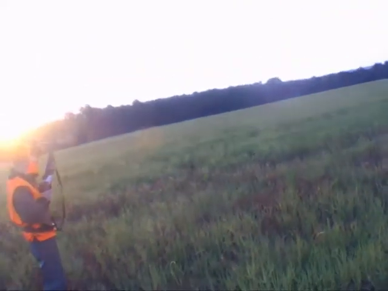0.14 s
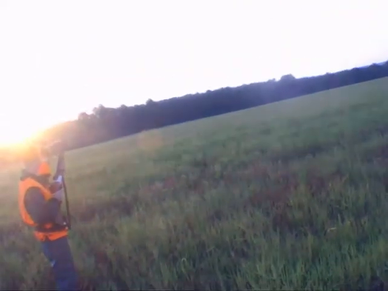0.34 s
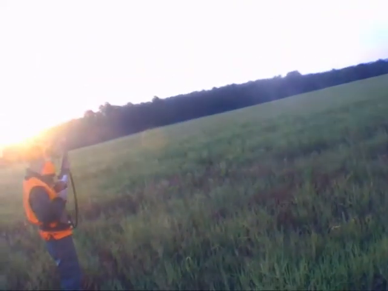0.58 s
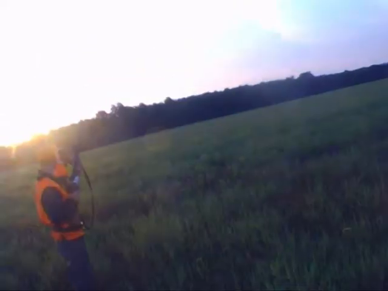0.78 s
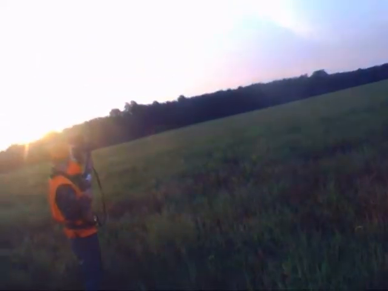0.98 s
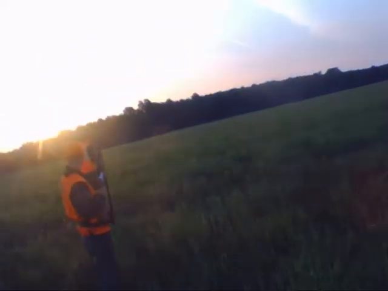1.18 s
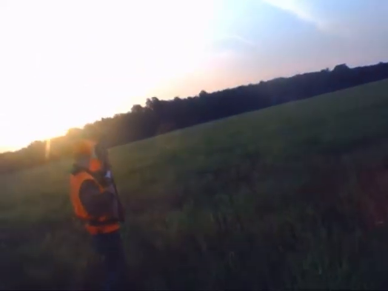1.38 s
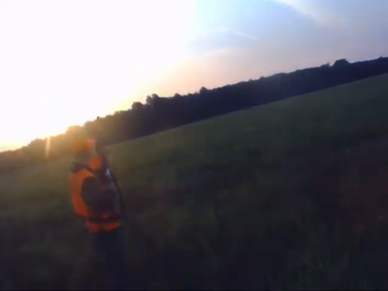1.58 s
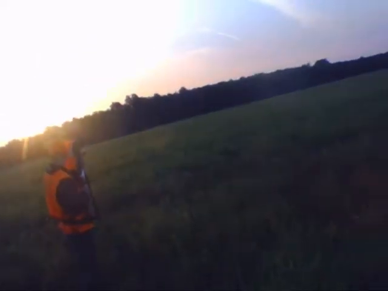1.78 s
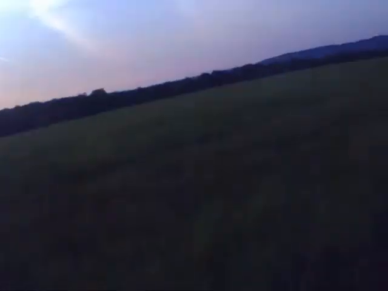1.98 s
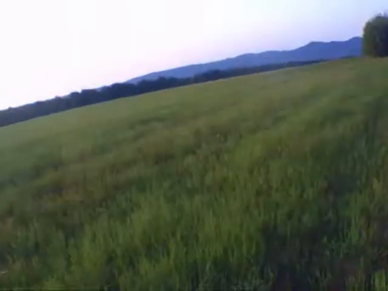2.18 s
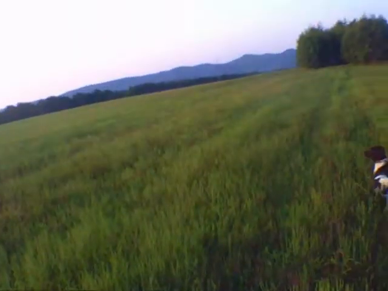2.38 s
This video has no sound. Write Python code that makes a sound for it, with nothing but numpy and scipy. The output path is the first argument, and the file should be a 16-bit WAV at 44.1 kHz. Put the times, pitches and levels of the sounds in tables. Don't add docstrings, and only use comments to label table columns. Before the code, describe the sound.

A hunter's gun fires once in a wide grassy field: abrupt bang, short noisy burst and low bumps, a small gap, then clumpy echoes rolling back from the trees, with faint cloth rustle and muffled treble.

```python
import sys
import numpy as np
from scipy import signal
from scipy.io import wavfile

SR = 44100
rng = np.random.default_rng(int(sys.argv[2]) if len(sys.argv) > 2 else 0)


def field_ratio(decibels):
    return 10 ** (np.asarray(decibels, dtype=float) / 20)


def generate_wav(sig):
    pcm = np.round(np.clip(np.atleast_2d(sig).T, -1, 1) * 32767).astype(np.int16)
    wavfile.write(sys.argv[1], SR, pcm)


N = 108045

# hz, density_db (dB per Hz)
AIR_COLOUR = [(18, -27), (30, -12.5), (75, -1), (152, -0.5), (182, -1.5), (443, -3.5), (2450, -10.5),
              (3780, -16.5), (7000, -20.5), (9100, -65.5), (15400, -120)]
# start_s, level_db
AIR_LEVEL = [(0, -71), (.17, -70), (.6, -69.5), (2.45, -72.5)]
# start_s, level_db, bass_slope_db (per octave), treble_slope_db (per octave)
SCATTER = [
    (.198, -39.5, -32, 3.5),
    (.206, -31.5, -0.5, 6),
    (.216, -18.5, -1.5, 0.5),
    (.252, -18.5, 2, -2.5),
    (.3, -34, 2.5, -0.5),
    (.34, -41.5, 2.5, -3),
    (.425, -54, -3, -1.5),
    (.45, -45, 1, -13),
    (.6, -68, -4, 0.5),
]
# hz, density_db (dB per Hz)
BLAST_COLOUR = [(30, -52.5), (70, -27.5), (130, -5.5), (390, 0), (640, -10), (900, -3), (1500, -4.5),
                (2300, -11.5), (7000, -21)]
# start_s, hold_s, pitch_hz, level_db
HEDGES = [(0.285, 0.068, 2900, -54), (0.37, 0.014, 817, -46), (0.452, 0.018, 1020, -50),
          (0.456, 0.035, 335, -61.5), (0.434, 0.051, 149, -54.5), (0.209, 0.025, 1441, -28.5),
          (0.607, 0.033, 2900, -60.5), (0.73, 0.13, 2900, -63.5), (0.729, 0.022, 5400, -69),
          (1.06, 0.088, 2080, -63), (1.215, 0.024, 4300, -80), (1.418, 0.021, 4100, -70),
          (1.464, 0.27, 3860, -83.5), (1.466, 0.29, 2600, -66.5), (2.253, 0.088, 1535, -60.5)]
# start_s, peak_db, pitch_hz
BUMPS = [
    (.211, -19.5, 165),
    (0.232, -30, 333.4),
    (0.306, -29, 182),
    (0.393, -37, 270),
    (0.443, -36, 1120),
]
# start_s, length_s, level_db, release_s
RUSTLES = [
    (0.429, 0.05, -59.5, 0.39),
    (0.598, 0.023, -65.5, 0.37),
    (0.73, 0.015, -71, 0.47),
    (1.042, 0.073, -63.5, 0.066),
    (1.128, 0.023, -69, 0.97),
    (1.212, 0.013, -75, 0.57),
    (1.405, 0.036, -80.5, 0.42),
]
# hz, density_db (dB per Hz)
CLOTH_COLOUR = [(1500, 2), (2500, 13), (3200, 9), (4200, 2.5), (5500, 8), (6800, -9.5)]
# start_s, level_db, bass_slope_db (per octave), treble_slope_db (per octave)
ECHO = [(0.58, -50, -8, -9), (0.606, -68.5, -8, -4), (0.626, -47, 9, 6), (0.636, -46, 11, 5),
        (0.73, -72, 3, 13), (0.746, -51, 6.5, 7), (0.856, -48.5, 12, -0.5), (1.022, -61.5, 13, 4),
        (1.116, -50, 3, 1.5), (1.132, -53, 6.5, -1), (1.434, -57, -3, 6.5), (1.454, -48.5, -3.5, 4),
        (1.47, -55, -4, 3.5), (1.516, -47, 3, 1), (1.85, -51, 5.5, 2), (1.938, -59, 1, 3.5),
        (2.34, -58.5, -1.5, -1), (2.45, -63, -1, -4)]
# hz, density_db (dB per Hz)
TREE_COLOUR = [(120, -60), (200, -51), (235, -55), (357, -11), (719, -1.5), (1120, -2.5), (1510, -10.5),
               (2480, -22.5), (5000, -50), (6500, -77), (11000, -120)]
# start_s, peak_db
TRUNKS = [(0.623, -35.5), (0.636, -43), (0.642, -38), (0.649, -37), (0.662, -52), (0.745, -39.5),
          (0.769, -36), (0.777, -30.5), (0.805, -32.5), (0.828, -37), (0.848, -30.5), (0.871, -36),
          (0.92, -35.5), (1.08, -36.5), (1.099, -36), (1.111, -32), (1.288, -59), (1.305, -38.5),
          (1.451, -37), (1.498, -39.5), (1.53, -39), (1.549, -38.5), (1.6, -35), (1.668, -40),
          (1.714, -34.5), (1.754, -35.5), (1.803, -37.5), (2.015, -42), (2.208, -41.5), (2.273, -52.5)]
# pitch_hz, width_hz, share_added (ratio)
PORT = [(1105, 400, 0.15), (1618, 290, 0.32), (2900, 100, -0.36), (3150, 390, -0.25), (4040, 560, 0.37),
        (5630, 170, 0.48), (6590, 550, 0.49)]

TIME_S = np.arange(N) / SR
LEAF_FROM_HZ = 1900


def rms_one(x):
    return x / np.sqrt(np.mean(x ** 2) + 1e-20)


def curve(rows):
    s, *columns = np.transpose(rows)
    return [np.interp(TIME_S, s, c) for c in columns]


def drift(rate_hz):
    r = np.exp(-2 * np.pi * rate_hz / SR)
    wander = signal.lfilter([1], [1, -2 * r, r * r], rng.standard_normal(N + SR))
    return rms_one(wander[SR:])


def grains(per_s, spread_db):
    sizes = field_ratio(spread_db * np.minimum(rng.exponential(1, N), 4))
    sizes = sizes * rng.choice([-1, 1], N)
    struck = rng.random(N) < per_s / SR
    return rms_one(sizes * struck + 1e-9)


def bandpass(x, order, edges_hz):
    return signal.sosfilt(signal.butter(order, edges_hz, "band", fs=SR, output="sos"), x)


def release(start_s, hold_s, release_s):
    return field_ratio(-60 * np.maximum(TIME_S - start_s - hold_s, 0) / release_s)


def colour(x, spectrum, bass_db=0, treble_db=0, bright=None):
    out, power = 0, 0
    edges = 25 * 2 ** np.arange(0, 8.4, 1 / 3)
    hz_at, db_at = np.transpose(spectrum)
    for k, (low, high) in enumerate(zip(edges, edges[1:])):
        hz = np.sqrt(low * high)
        gain = field_ratio(np.interp(np.log(hz), np.log(hz_at), db_at))
        source = x if bright is None or hz < LEAF_FROM_HZ else bright
        slope_db = bass_db if hz < 1000 else treble_db
        tilt = field_ratio(slope_db * np.log2(hz / 1000))
        out = out + (-1) ** k * gain * tilt * bandpass(source, 2, [low, high])
        power += gain ** 2 * (high - low) * 2 / SR
    return out / np.sqrt(power)


def field_air():
    level = field_ratio(curve(AIR_LEVEL)[0] + 0.51 * drift(18))
    return level * colour(rng.standard_normal(N), AIR_COLOUR)


def shot():
    crack_s, crack_db = .1982, -28
    muzzle_s, muzzle_db = .2025, -13
    suction_s, suction_db = .0018, -14

    u = (TIME_S - crack_s) * 1200
    crack = -field_ratio(crack_db) * (1 - 2 * u) * (u > 0) * (u < 1)

    v = TIME_S - muzzle_s
    spike = field_ratio(muzzle_db) * 2 * np.exp(-(v * 7000) ** 2)
    onset = np.clip(v * 3000 + 2, 0, 1)
    suction = field_ratio(suction_db) * np.exp(-np.maximum(v, 0) / suction_s) * onset

    level_db, bass_db, treble_db = curve(SCATTER)
    started = TIME_S > crack_s
    alive = np.clip(1 - (TIME_S - SCATTER[-1][0]) * 10, 0, 1) * started
    low, high = grains(4300, 1.65), grains(4300, 1.65)
    scatter = colour(low * started, BLAST_COLOUR, bass_db, treble_db, high)
    return crack + spike - suction + field_ratio(level_db) * alive * scatter


def hedges():
    width, release_s = 0.067, 0.33
    out, clicks = 0, grains(3000, 0.86)
    for s, hold_s, hz, db in HEDGES:
        band = rms_one(bandpass(clicks, 2, hz * (1 + width * np.array([-1, 1]))))
        rise = np.clip((TIME_S - s) * 100, 0, 1)
        out = out + field_ratio(db) * band * rise * release(s, hold_s, release_s)
    return out


def bumps():
    fade_cycles, bass_cut_hz = 1.8, 120
    out = 0
    for s, db, hz in BUMPS:
        cycles = np.maximum(TIME_S - s, 0) * hz
        decay = field_ratio(-60 * cycles / (fade_cycles * 2))
        rise = 1 - np.exp(-cycles * 4.5)
        out = out + field_ratio(db + 11.5) * np.sin(2 * np.pi * cycles) * decay * rise
    return signal.sosfilt(signal.butter(4, bass_cut_hz, "high", fs=SR, output="sos"), out)


def rustle():
    shape = 0
    for s, length_s, db, release_s in RUSTLES:
        rise = np.clip((TIME_S - s) * 200, 0, 1)
        shape = shape + field_ratio(db) * rise * release(s, length_s, release_s)
    return shape * colour(grains(6000, 2.5), [(200, -67)] + CLOTH_COLOUR)


def echo():
    level_db, bass_db, treble_db = curve(ECHO)
    gain = field_ratio(level_db) * np.clip((TIME_S - ECHO[0][0]) * 50, 0, 1) + 1e-12
    clumps = field_ratio(-0.5 * drift(120))
    clicks = gain * rms_one(grains(1400, 1.45) * clumps)
    for s, db in TRUNKS:
        clicks[int(s * SR)] += field_ratio(db + 11)
    leaves = gain * grains(3800, 1.7)
    return colour(clicks, TREE_COLOUR, bass_db, treble_db, leaves)


def bird():
    start_s, length_s, level_db = 2.16, .085, -81
    pitch_hz, drop_hz, smear_hz = 6800, 700, 110
    u = np.clip((TIME_S - start_s) / length_s, 0, 1)
    hz = pitch_hz - drop_hz * u ** 2 + smear_hz * drift(330)
    level = field_ratio(level_db + 1.3 * drift(65)) * np.sin(np.pi * u) ** .5
    return level * np.sin(2 * np.pi * np.cumsum(hz) / SR)


def port(x):
    out = x
    for hz, width_hz, share in PORT:
        r = np.exp(-np.pi * width_hz / SR)
        feed = np.array([1, 0, -1]) * (1 - r * r) / 2
        ring = [1, -2 * r * np.cos(2 * np.pi * hz / SR), r * r]
        out = out + share * signal.lfilter(feed, ring, x)
    return out


def scene():
    return (field_air() + shot() + hedges() + bumps() + rustle() + echo() + bird())[None]


def low_pass(x):
    return signal.sosfilt(signal.butter(12, 11800, fs=SR, output="sos"), x)


def record(dry):
    overload_at, cut_hz, sampling_hz = .25, 6780, 16000
    mirror_db, mirror_band_hz, hiss_db = -6, [8240, 10060], -95
    x = port(dry)
    x = x / (1 + np.abs(x / overload_at) ** 4) ** .25
    x = signal.sosfilt(signal.cheby1(10, .5, cut_hz, fs=SR, output="sos"), x)
    mirror = x * np.cos(2 * np.pi * sampling_hz * TIME_S)
    mirror = bandpass(mirror, 4, mirror_band_hz)
    hiss = field_ratio(hiss_db) * rng.standard_normal(x.shape)
    return low_pass(x + field_ratio(mirror_db) * mirror + hiss)


dry = scene()
out = record(dry)
generate_wav(out)
```